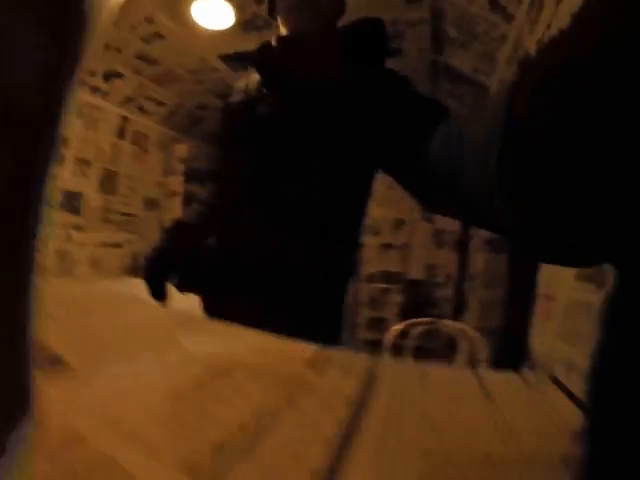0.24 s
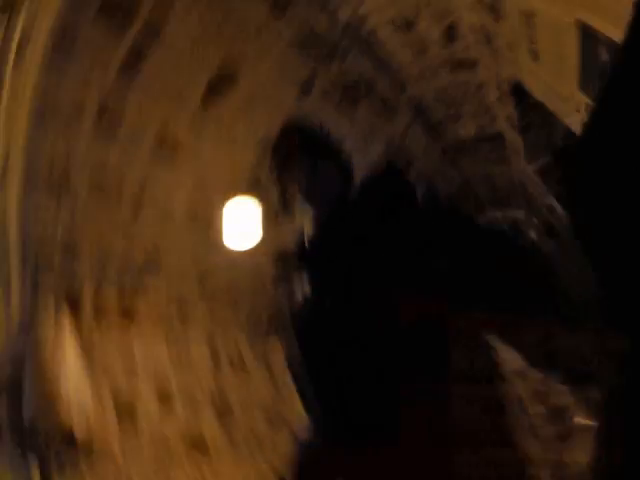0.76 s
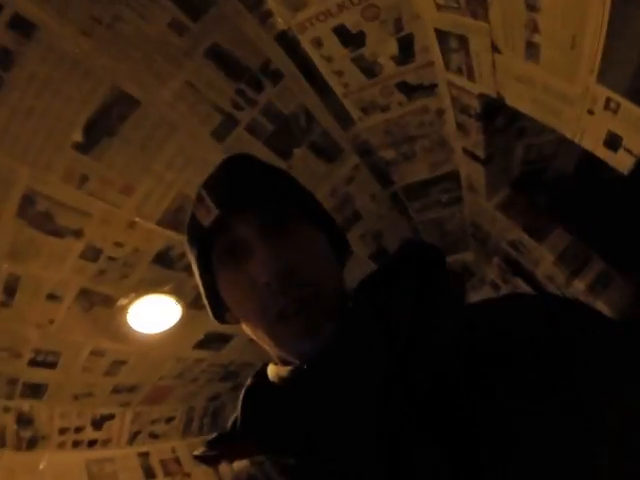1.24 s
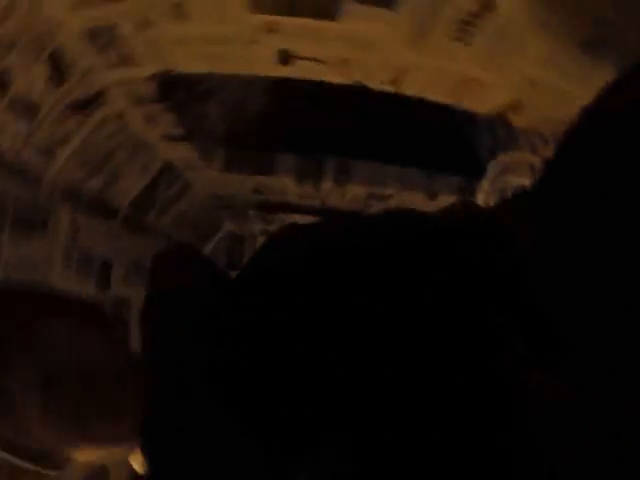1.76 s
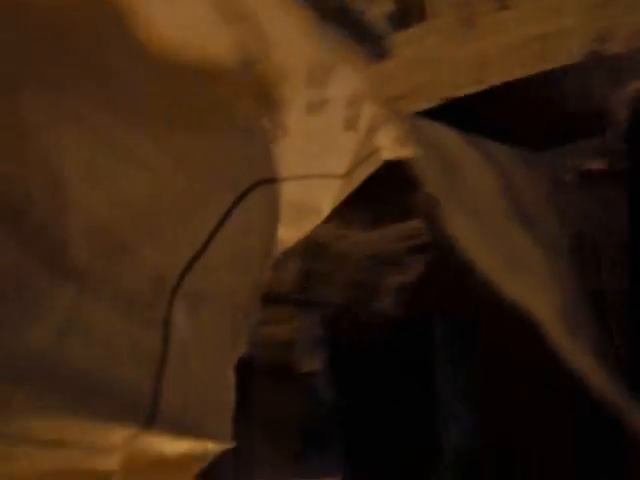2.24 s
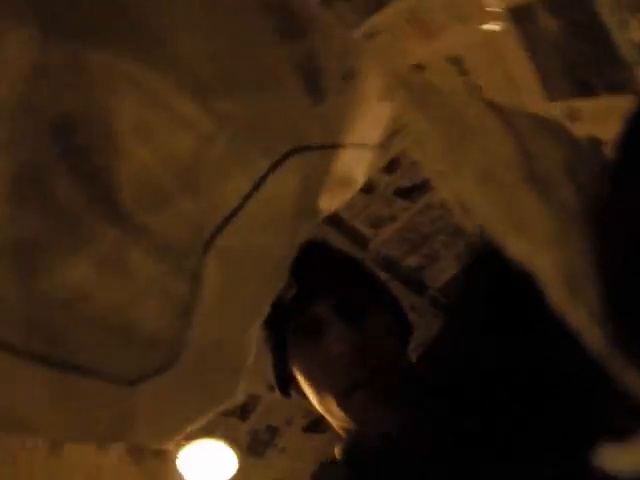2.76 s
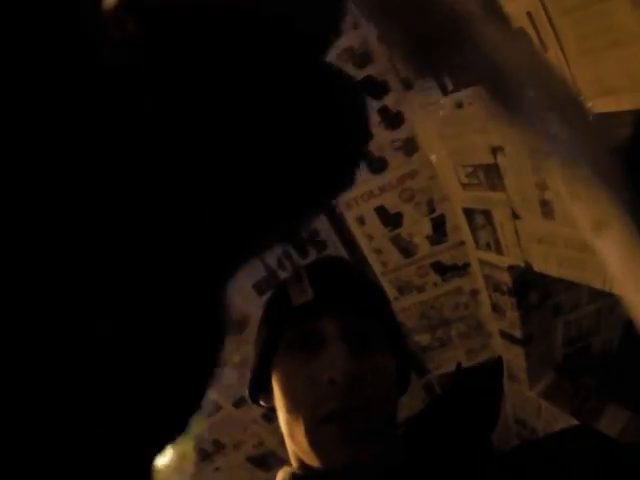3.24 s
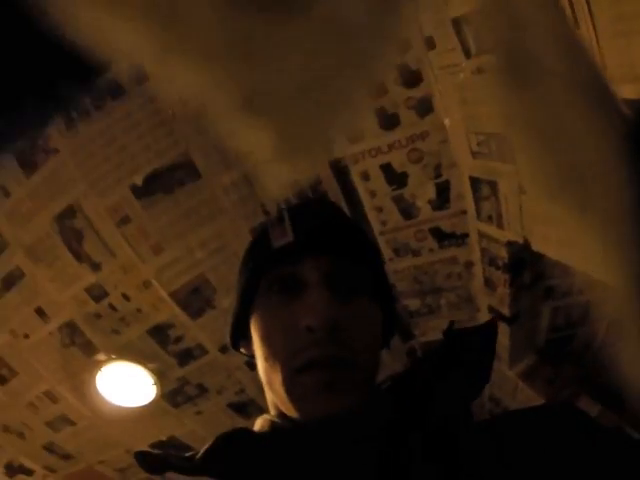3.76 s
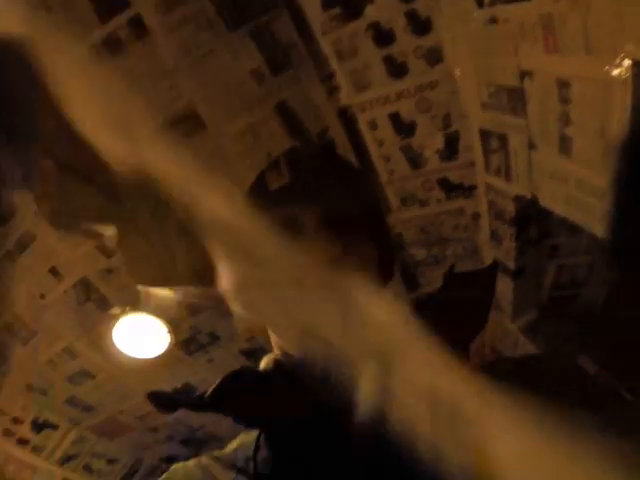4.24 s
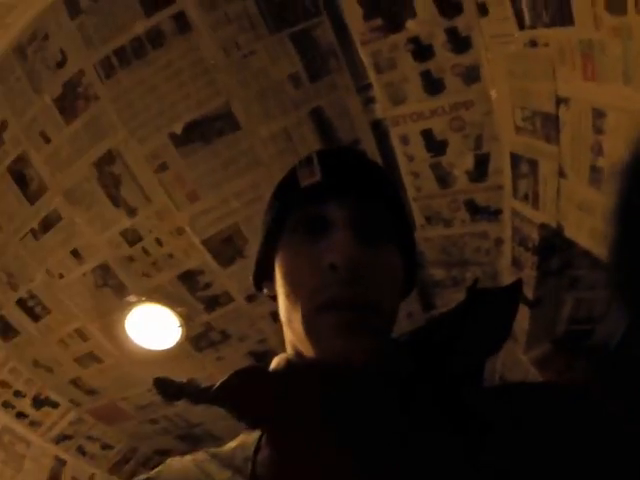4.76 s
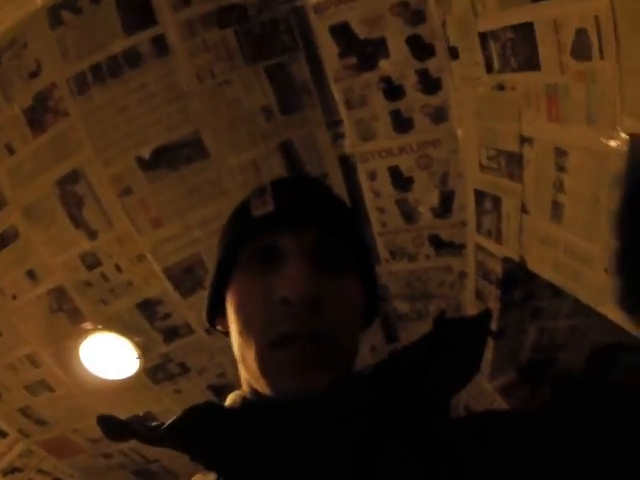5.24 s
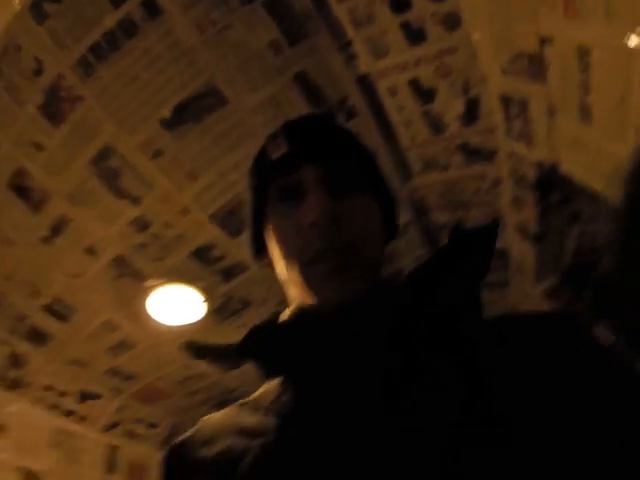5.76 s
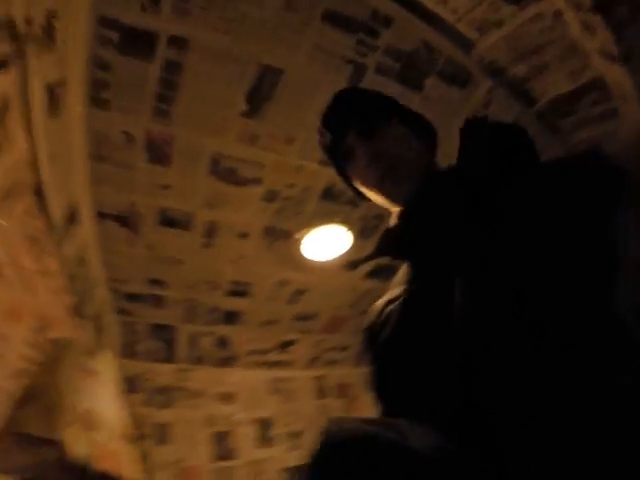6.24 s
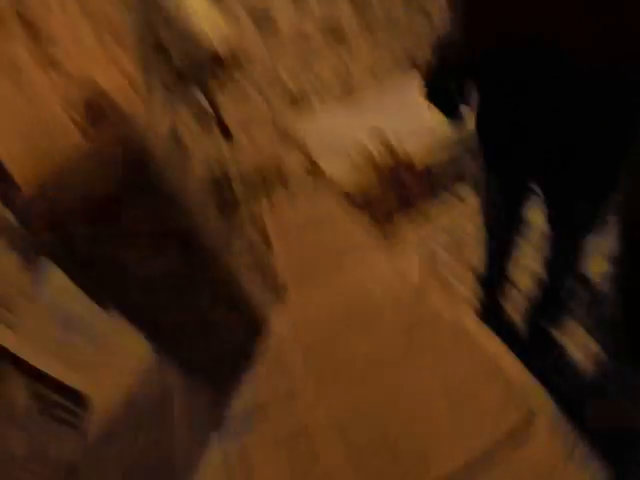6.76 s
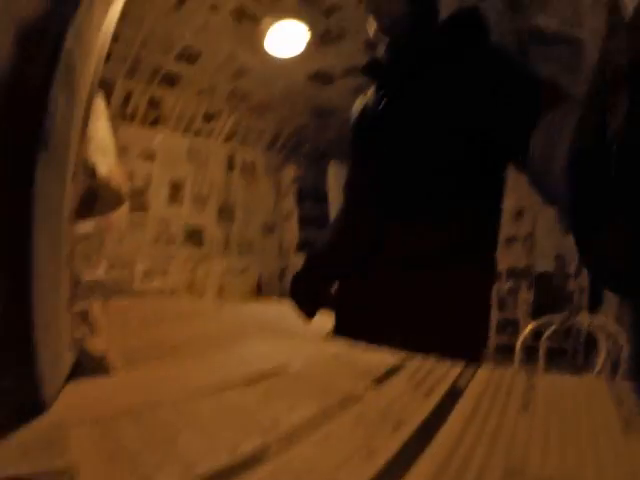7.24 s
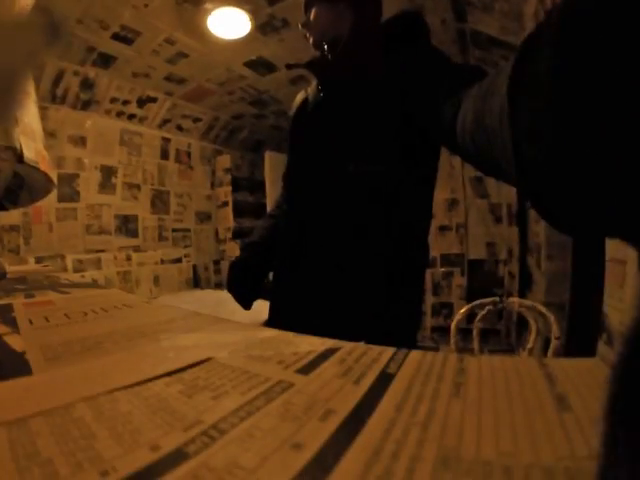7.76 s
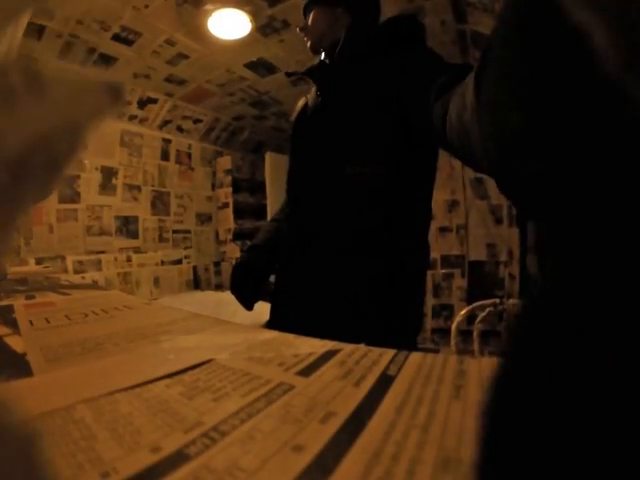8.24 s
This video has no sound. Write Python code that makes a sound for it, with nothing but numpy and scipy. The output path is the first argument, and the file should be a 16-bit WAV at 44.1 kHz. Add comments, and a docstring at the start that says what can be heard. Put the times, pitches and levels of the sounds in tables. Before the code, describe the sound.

Sheets of newspaper are handled against a small camera's microphone. Soft rubbing and brief hissing slides come first, then dense crackling, hard snaps and knocks as paper buckles over the housing. A short lull near six seconds gives way to more sliding, clicks and soft bumps. The small paper-lined room is dry and dull; the very close sound is muffled, with the loudest hits overloading.

```python
"""Newspaper sheets slide and crackle close to the microphone of a small camera in a little paper-lined room.
Filtered noise is the paper's hiss, and clumped random clicks ringing in small patches are its crackle.
At the microphone itself hands and paper rub and scrape the housing, in uneven jerks and juddering noise.
Snaps, knocks and buckling creases ring paper and housing, and soft bumps boom as low decaying tones.
A short dull room lies behind; gain control, treble loss and overload in the microphone shape the whole."""
import sys
import numpy as np
from scipy import signal
from scipy.fft import rfft, irfft, next_fast_len
from scipy.io import wavfile
from scipy.ndimage import uniform_filter1d

SR = 44100
rng = np.random.default_rng(int(sys.argv[2]) if len(sys.argv) > 2 else 0)


def master(y):
    """Save y as 16-bit WAV."""
    cut = np.clip(np.atleast_2d(y).T, -1, 1)
    pcm = np.round(cut * 32767)  # scale
    wavfile.write(sys.argv[1], SR, pcm.astype(np.int16))


N = 374850
TIME = np.arange(N) / SR
BLOW_TIME = TIME[:int(0.06 * SR)]   # a blow rings for 60 ms at most
CUTOFF_HZ = 15300   # nothing is picked up above this


def from_db(db):
    """Decibels to gain."""
    return 10 ** (np.asarray(db) / 20)


def rms_one(x):
    """Scale to unit power."""
    return x / np.sqrt(np.mean(x ** 2) + 1e-20)


def even(x, span_s=0.042):
    """Hold the power at 1 over longer stretches, keeping the quick grain."""
    power = uniform_filter1d(x * x, int(span_s * SR))
    return x / np.sqrt(np.maximum(power, 1e-12))


def in_time(rows):
    """Join the rows of a curve by straight lines."""
    s, *columns = np.transpose(rows)
    return [np.interp(TIME, s, column) for column in columns]


def add(out, s, x):
    """Mix x into out from time s."""
    part = out[int(s * SR):][:len(x)]
    part += x[:len(part)]


def band(x, edges_hz, kind="band", order=2):
    """Causal Butterworth filter."""
    sos = signal.butter(order, edges_hz, kind, fs=SR, output="sos")
    return signal.sosfilt(sos, x + 1e-18)


def resonate(x, hz, width_hz):
    """One resonance with gain 1 at its top."""
    r = np.exp(-np.pi * width_hz / SR)
    top = np.array([1, 0, -1]) * (1 - r * r) / 2
    bottom = [1, -2 * r * np.cos(2 * np.pi * hz / SR), r * r]
    return signal.lfilter(top, bottom, x + 1e-18)


def colour(x, spectrum):
    """Give x a smooth spectrum; rms 1."""
    hz, db = np.transpose(spectrum)
    size = next_fast_len(N + 4096)
    bins_hz = np.maximum(np.arange(size // 2 + 1) * SR / size, 1)
    gain = from_db(np.interp(np.log(bins_hz), np.log(hz), db))
    return rms_one(irfft(rfft(x, size) * gain, size)[:N])


def drift(rate):
    """Smooth chance: `rate` random points a second joined by straight lines; rms 1."""
    points = np.clip(rng.standard_normal(N), -2, 2)
    return rms_one(np.interp(TIME * rate, np.arange(N), points))


def slips(per_s, spread_db):
    """Random clicks of either sign, mostly small and a few large."""
    sizes = from_db(spread_db * np.minimum(rng.exponential(1, N), 4))
    return (rng.random(N) < per_s / SR) * sizes * rng.choice([-1, 1], N)


# Sheets sliding past close to the microphone. Each row: start in seconds, length before release in seconds,
# paper hiss in dB, dull rubbing in dB.
SLIDES = [(0.466, 0.13, -53.5, -55), (0.631, 0.1, -46, -49), (0.765, 0.11, -43, -39),
          (0.891, 0.42, -47.5, -59.5), (1.491, 0.16, -39.5, -62), (1.719, 0.082, -39, -41),
          (1.838, 0.15, -49, -38.5), (2.817, 0.1, -50, -76), (2.964, 0.22, -43, -42.5),
          (3.947, 0.16, -43.5, -52), (4.084, 0.027, -31, -36), (4.212, 0.076, -42.5, -47.5),
          (4.645, 0.18, -50, -52.5), (4.908, 0.093, -44, -48), (5.303, 0.048, -37, -65),
          (5.654, 0.046, -36, -65), (6.358, 0.14, -41, -45.5), (6.559, 0.16, -47, -42),
          (6.914, 0.12, -46.5, -65), (7.131, 0.31, -42.5, -44), (7.786, 0.098, -43.5, -46.5),
          (7.969, 0.15, -54, -58)]
# Light contact at the microphone between the slides, before any slackening. Each row: time in seconds,
# paper hiss in dB, dull rubbing in dB.
LIGHT_CONTACT = [(0.0, -52.5, -51.5), (0.32, -61, -50.5), (1.43, -56, -56), (2.3, -52.5, -60),
                 (3.6, -53.5, -59.5), (4.35, -54, -66), (4.6, -51, -43), (5.18, -59.5, -65.5),
                 (5.56, -53.5, -51.5), (5.9, -74, -89), (6.25, -48, -49.5), (7.55, -56, -54.5),
                 (8.2, -64, -59.5), (8.5, -48.5, -45.5)]
SLIDE_ATTACK_S, SLIDE_RELEASE_S = 0.013, 0.018   # a sheet catches quickly and dies away as it lets go


def handling():
    """Hiss and rubbing levels in dB: every slide adds its attack, hold and release to the light contact."""
    power = from_db(in_time(LIGHT_CONTACT) - slack()) ** 2
    for s, length_s, *levels_db in SLIDES:
        now = slice(*np.searchsorted(TIME, [s, s + length_s + 10 * SLIDE_RELEASE_S]))
        t = TIME[now] - s
        release = np.exp(-np.maximum(t - length_s, 0) / SLIDE_RELEASE_S)
        speed = np.minimum(t / SLIDE_ATTACK_S, 1) * release
        power[:, now] += np.outer(from_db(levels_db), speed) ** 2
    return 10 * np.log10(power)


RELIEF_FROM_DB, RELIEF_SHARE, RELIEF_S = -36.5, 0.82, 0.041   # stronger blows slacken the sheet more


def slack():
    """How far the light contact drops, in dB, after each snap or crunch has let the tension go."""
    relief_db = np.zeros(N)
    for s, strength_db, *_ in (*SNAPS, *CRUNCHES):
        relief_db[int(s * SR)] = RELIEF_SHARE * max(strength_db - RELIEF_FROM_DB, 0)
    return signal.lfilter([1], [1, -np.exp(-1 / (RELIEF_S * SR))], relief_db)


# How open the paper sounds; lowest with sheets close over the microphone.
# Each row: time in seconds, lift of the treble in dB.
TREBLE_LIFT = [(0.65, 17.5), (1.3, 10.5), (2.9, 7.5), (3.3, 0), (5.3, 6), (7.25, 16), (8.4, 13)]
# Spectrum of paper close to the microphone. Each row: frequency in Hz, relative level in dB per Hz.
PAPER = [(300, 0), (850, -0.5), (1400, -0.5), (3400, -3), (5600, -19), (10500, -23), (15000, -33.5)]
WRINKLE_SPREAD_DB, WRINKLE_SHARE = 2.6, 2.2   # spread of tick sizes; gain of the ticks against the hiss


def paper(level_db, grains_per_s=600, flutter_db=3.0):
    """Fibres slide with a fine hiss, and small wrinkles tick in clumps."""
    lift_db, = in_time(TREBLE_LIFT)
    hiss = colour(rng.standard_normal(N), PAPER)
    clumps = from_db(6 * drift(45))
    crackle = colour(slips(grains_per_s * clumps, WRINKLE_SPREAD_DB), PAPER)
    # sheets pressed close crumple; sheets sliding freely swish
    crumple = WRINKLE_SHARE * from_db(-lift_db / 2)
    sheet = even(hiss + crumple * (crackle + wrinkles(14 * clumps)))
    sheet = sheet * from_db(level_db + flutter_db * drift(70))
    # the body of the sound stays; only the treble follows the sheets
    body = signal.sosfiltfilt(signal.butter(2, 4300, fs=SR, output="sos"), sheet)
    return body + from_db(lift_db) * (sheet - body)


def wrinkles(per_s, drag=0.0071, patchy_db=6.0):
    """Patches of the sheet, each with its own pitch, tick and swell, so that the colour keeps shifting; rms 1."""
    patches = np.zeros(N)
    for hz in np.geomspace(500, 4500, num=11):
        ticks = slips(per_s, WRINKLE_SPREAD_DB)
        dragging = drag * from_db(patchy_db * drift(18)) * rng.standard_normal(N)
        patches += resonate(ticks + dragging, hz, hz / 4) / np.sqrt(hz)
    return colour(patches, PAPER)


# Single sharp snaps and knocks on the housing, at the microphone. Each row: time in seconds, strength in dB,
# pitch of the struck patch in Hz, crack in dB relative to the strength.
SNAPS = [(0.2424, -26, 1340, 5.5), (1.5252, -23.5, 1600, -1.5), (1.7447, -41, 3380, 8.5),
         (2.048, -25.5, 990, -8), (2.1542, -25, 607, -1), (2.265, -21.5, 545, -3), (2.37, -32, 1640, -5.5),
         (2.448, -33, 1630, -2.5), (2.9239, -27, 990, -7.5), (2.9989, -26, 1310, -6),
         (3.046, -22.5, 532, -5), (3.171, -31, 1570, -2), (3.196, -21.5, 1330, -1),
         (3.2086, -32, 2010, -16), (3.2643, -41.5, 1270, -15), (3.615, -17.5, 1490, -1),
         (3.958, -29, 950, -8.5), (4.468, -34, 880, -10), (4.494, -36.5, 510, -9), (4.543, -24, 650, -4.5),
         (4.5744, -18.5, 665, -2), (4.6534, -31, 458, -1), (5.2944, -30.5, 3000, -0.5),
         (5.4495, -28.5, 306, -6), (5.6244, -27, 595, -11.5), (6.197, -29, 720, -3),
         (6.6673, -32, 770, -10.5), (7.236, -24, 2440, -10), (7.4351, -31.5, 3200, 4.5),
         (7.459, -30.5, 2140, 1), (7.48, -31.5, 1150, -8.5), (7.8949, -23, 510, 0), (8.002, -29, 410, -7.5),
         (8.2128, -31, 270, -5)]


def snaps(chatter=0.18, chatter_s=0.0016):
    """One hard click with a very short chatter behind it."""
    out = np.zeros(N)
    for s, strength_db, pitch_hz, crack_db in SNAPS:
        force = chatter * rng.standard_normal(len(BLOW_TIME)) * np.exp(-BLOW_TIME / chatter_s)
        force[0] = 1
        add(out, s, from_db(strength_db) * blow(force, pitch_hz, crack_db))
    return out


# Creases close to the microphone that buckle in a run of slips. Each row: start in seconds, strength in dB,
# pitch of the buckling patch in Hz, time until it gives way in seconds.
CRUNCHES = [(0.85, -34, 3150, 0.0061), (1.584, -29, 1050, 0.0068), (1.618, -27.5, 440, 0.0035),
            (1.805, -24, 640, 0.0035), (2.034, -32, 3120, 0.0015), (2.084, -35.5, 1150, 0.0068),
            (2.2245, -38, 674, 0.005), (2.417, -33, 650, 0.012), (2.51, -41, 1560, 0.0029),
            (3.009, -31, 840, 0.0032), (3.0414, -29.5, 2040, 0.0019), (3.075, -30.5, 930, 0.0056),
            (3.142, -22, 1310, 0.0047), (3.156, -27.5, 1010, 0.0064), (3.326, -27.5, 1430, 0.008),
            (3.44, -39.5, 980, 0.0081), (3.612, -25, 2420, 0.0028), (3.728, -30.5, 526, 0.0084),
            (3.768, -26, 2100, 0.0034), (4.28, -27, 1600, 0.0035), (4.384, -41, 1980, 0.014),
            (4.424, -31.5, 1080, 0.0063), (4.728, -34.5, 480, 0.0062), (4.909, -33.5, 1670, 0.0048),
            (4.921, -36, 620, 0.0073), (5.049, -34, 2700, 0.0072), (5.068, -34, 566, 0.0047),
            (5.2426, -30.5, 1620, 0.0045), (5.316, -30.5, 1090, 0.0072), (5.379, -32, 490, 0.0083),
            (5.401, -29.5, 1000, 0.0053), (5.505, -33.5, 604, 0.0064), (5.523, -37, 447, 0.008),
            (5.554, -35.5, 620, 0.0063), (6.3792, -23.5, 750, 0.0057), (6.475, -34.5, 980, 0.012),
            (6.849, -37, 600, 0.0057), (7.223, -26.5, 1810, 0.004), (7.37, -39, 405, 0.009),
            (8.276, -46.5, 1170, 0.0076), (8.413, -38, 780, 0.003)]
CRUNCH_CRACK_DB, CRACK_DB_PER_OCTAVE = -7, 3.5   # smaller creases crack harder


def crunches(slips_per_s=3500, settle_s=0.0015):
    """A crease buckles in uneven slips that grow until it gives way."""
    out, t = np.zeros(N), BLOW_TIME
    for s, strength_db, pitch_hz, length_s in CRUNCHES:
        strain = (0.5 + np.minimum(t / length_s, 1)) * np.exp(-np.maximum(t - length_s, 0) / settle_s)
        force = strain * (rng.random(len(t)) < slips_per_s / SR) * rng.standard_normal(len(t))
        force[0] = 1
        crack_db = CRUNCH_CRACK_DB + CRACK_DB_PER_OCTAVE * np.log2(pitch_hz / MIDDLING_HZ)
        add(out, s, from_db(strength_db) * blow(force, pitch_hz, crack_db))
    return out


# Resonances of the housing around the microphone. Each row: centre in Hz before a random shift, width in Hz,
# level in dB before a random change.
HOUSING = [(493, 153, 9), (791, 89, 4.5), (1284, 148, -3), (2230, 700, 2), (3100, 366, 7.5)]
THUD_HZ, KNOCK_HZ, CRACK_HZ = 140, 720, 1900   # lower edges of the registers
THUD_DB, KNOCK_DB, PATCH_DB = -3.5, 0, -1   # make-up of a blow of middling pitch whose crack is at 0 dB
MIDDLING_HZ, HARDER_DB_PER_OCTAVE = 1170, 1.97   # smaller patches ring higher, with less thud
CRACK_TOP_HZ, THUD_LOSS = 8020, 0.3   # a harder crack reaches higher and leaves less thud (dB per dB)
PATCH_Q, CONTACT_VARY_DB = 2.2, 3.5


def blow(force, pitch_hz, crack_db, detune=0.23):
    """A force rings the patch of paper and the housing, whose resonances shift with the point of contact."""
    ring = np.zeros(len(force))
    for hz, width_hz, db in HOUSING:
        gain = from_db(db + rng.uniform(-CONTACT_VARY_DB, CONTACT_VARY_DB))
        ring += gain * resonate(force, hz * np.exp(rng.uniform(-detune, detune)), width_hz)
    patch = resonate(force, pitch_hz, pitch_hz / PATCH_Q)
    patch = band(patch, [pitch_hz / 2, pitch_hz * 2], order=1)
    thud_db = THUD_DB - HARDER_DB_PER_OCTAVE * np.log2(pitch_hz / MIDDLING_HZ) - THUD_LOSS * crack_db
    top_hz = np.clip(CRACK_TOP_HZ * from_db(crack_db / 2), 2 * CRACK_HZ, CUTOFF_HZ)
    parts = [(thud_db, band(ring, [THUD_HZ, KNOCK_HZ])),
             (KNOCK_DB, band(ring, [KNOCK_HZ, CRACK_HZ])),
             (crack_db, band(ring, [CRACK_HZ, top_hz])),
             (PATCH_DB, patch)]
    # a part at 0 dB carries the energy of 10 ms at unit power
    return sum(from_db(db) * rms_one(x) for db, x in parts) * np.sqrt(0.01 / BLOW_TIME[-1])


# Spectrum of rubbing heard through the housing. Each row: frequency in Hz, relative level in dB per Hz.
RUB = [(25, -13.5), (85, 1), (170, -4.5), (300, -2.5), (470, 0.5), (640, -7), (850, -3.5), (2800, -41.5),
       (9000, -36.5)]
RUB_FLUTTER_DB = 3.5


def stick_slip(per_s, grit):
    """Rubbing catches and lets go in uneven jerks that boom in the housing."""
    jerks = rms_one(slips(per_s, spread_db=2.0))
    return even(colour(jerks + grit * rng.standard_normal(N), RUB))


# Strokes dragged across the housing, at the microphone. Each row: middle in seconds, length between
# half-pressure points in seconds, pressure in dB, pitch of the judder in Hz.
SCRAPES = [(0.422, 0.02, -36.5, 430), (0.709, 0.045, -38.5, 453), (1.606, 0.049, -35, 370),
           (1.668, 0.039, -34.5, 470), (1.817, 0.038, -37, 375), (1.946, 0.013, -29, 233),
           (4.443, 0.067, -44.5, 302), (5.356, 0.083, -42.5, 535), (5.684, 0.032, -38, 322),
           (5.767, 0.048, -44.5, 284), (6.969, 0.036, -40, 340)]
JUDDER_WIDTH_HZ = 130


def scrapes(judder_db=7.5, rough_db=5.5, crumple_db=-3.0):
    """Each stroke swells and fades, juddering at a pitch set by the grip and crumpling the paper as it goes."""
    rough = from_db(rough_db) * stick_slip(per_s=400, grit=0.86)
    rough = rough + from_db(crumple_db) * even(wrinkles(34))
    out = np.zeros(N)
    for s, length_s, db, hz in SCRAPES:
        pressure = from_db(db) / (1 + (2 * (TIME - s) / length_s) ** 4)
        judder = resonate(rng.standard_normal(N), hz, JUDDER_WIDTH_HZ)
        judder = even(band(judder, [hz / 2, hz * 2]))
        out += pressure * (from_db(judder_db) * judder + rough)
    return out


# Bumps that set the table or the hand-held body booming. Each row: start in seconds, frequency in Hz,
# level in dB before the soft rise, time to fall by 60 dB in seconds.
BOOMS = [(0.409, 77.6, -42, 0.57), (0.73, 87, -39.5, 0.74), (4.101, 100, -27, 0.17), (5.45, 172, -27, 0.14),
         (5.769, 105, -46.5, 0.4), (6.948, 61.4, -34, 0.4), (8.212, 195, -26, 0.11)]


def booms(rise_s=0.0018):
    """A soft bump leaves one low mode ringing."""
    out = np.zeros(N)
    for s, hz, db, t60_s in BOOMS:
        t = np.maximum(TIME - s, 0)
        decay = from_db(db - 60 * t / t60_s)
        out += decay * (1 - np.exp(-t / rise_s)) * np.sin(2 * np.pi * hz * t)
    return out


ROOM_T60_S, ROOM_DB = 0.089, -29.5


def room(x, wall_hz=1400, hollow_hz=477, hollow_width_hz=150, hollow_db=7):
    """Paper-lined walls return a short, dull tail with one hollow resonance."""
    t = TIME[:SR // 2]
    echoes = band(rng.standard_normal(len(t)), [150, wall_hz], order=1)
    hollow = from_db(hollow_db) * resonate(echoes, hollow_hz, hollow_width_hz)
    tail = (echoes + hollow) * from_db(-60 * t / ROOM_T60_S) * (t > 0.006)
    return signal.fftconvolve(x, tail / np.sqrt(np.sum(tail ** 2)))[:N]


def scene():
    """Paper, rubbing, scrapes, bumps and snaps at the microphone, in a small dull room."""
    paper_db, rub_db = handling()
    rubbing = from_db(rub_db + RUB_FLUTTER_DB * drift(35)) * stick_slip(per_s=270, grit=0.8)
    near = paper(paper_db) + rubbing + scrapes() + booms() + snaps() + crunches()
    return (near + from_db(ROOM_DB) * room(near))[None]


def gain_control(x, threshold_db=-16, smoothing_s=0.017):
    """Peaks above the threshold push the gain down with a lag, and it recovers at the same pace."""
    over_db = np.maximum(20 * np.log10(abs(x) + 1e-9) - threshold_db, 0)
    r = np.exp(-1 / (smoothing_s * SR))
    return x * from_db(-signal.lfilter([1 - r], [1, -r], over_db))


TREBLE_CUT_HZ, OVERLOAD = 3060, 0.228   # OVERLOAD is the amplitude that cannot be passed


def record(dry):
    """Gain control lags behind the sharpest snaps, the treble falls away, peaks overload and the top is cut."""
    held = band(gain_control(dry), TREBLE_CUT_HZ, "low", order=1)
    clipped = held / (1 + (held / OVERLOAD) ** 8) ** (1 / 8)
    top_cut = signal.ellip(10, 0.1, 80, CUTOFF_HZ, fs=SR, output="sos")
    return signal.sosfilt(top_cut, clipped)


dry = scene()
out = record(dry)
master(out)
```